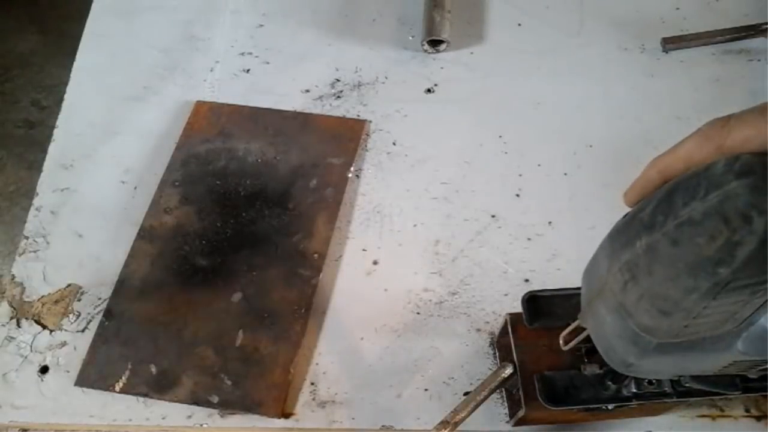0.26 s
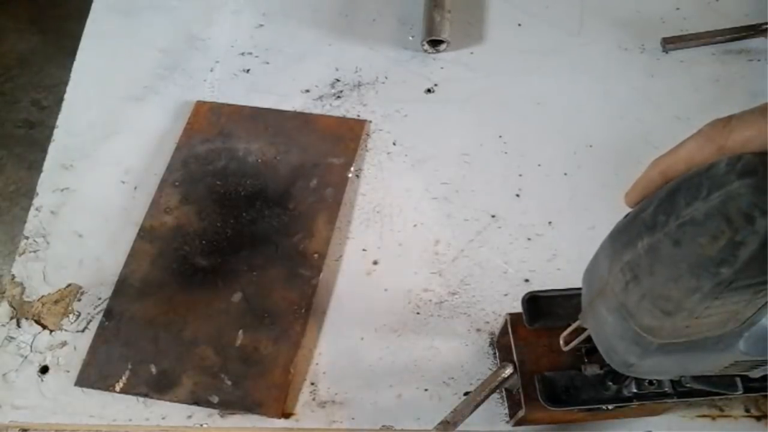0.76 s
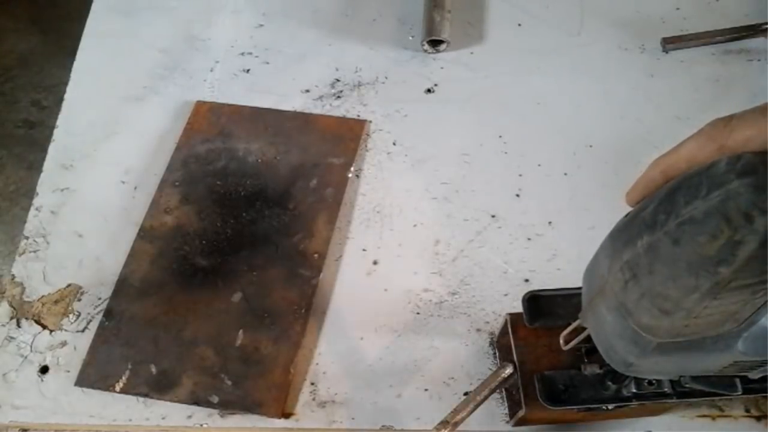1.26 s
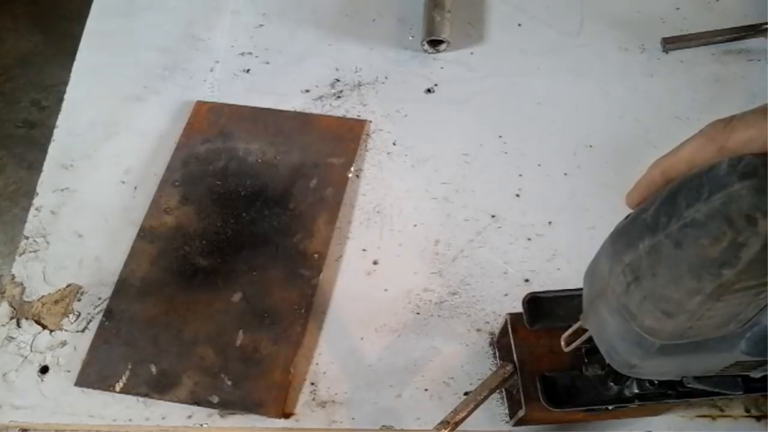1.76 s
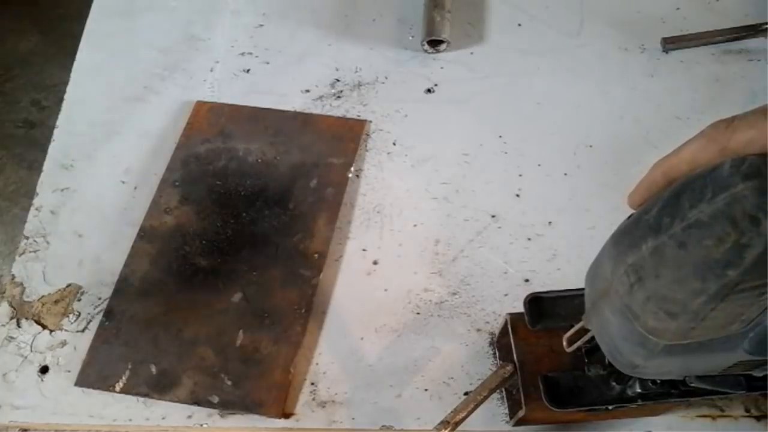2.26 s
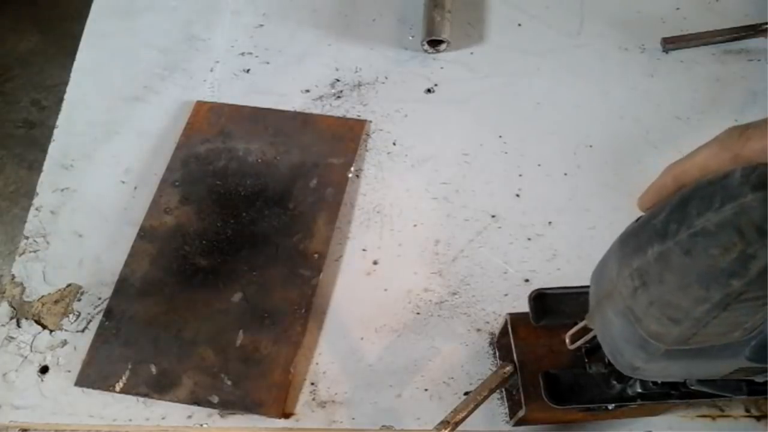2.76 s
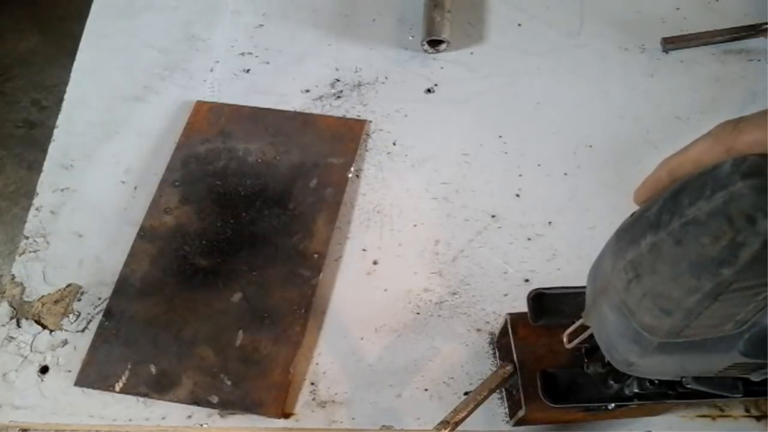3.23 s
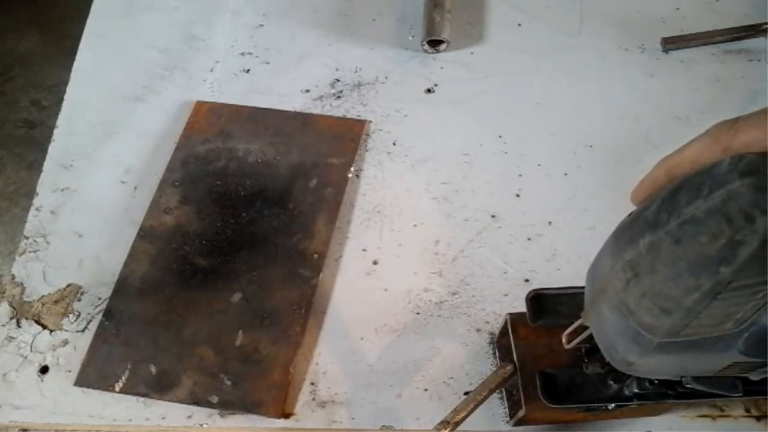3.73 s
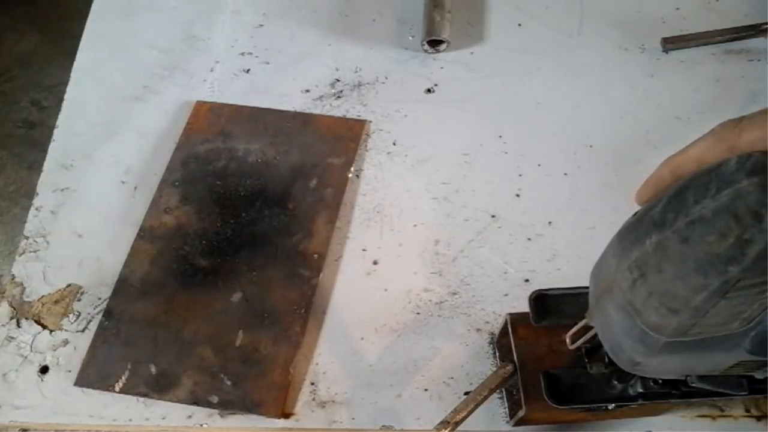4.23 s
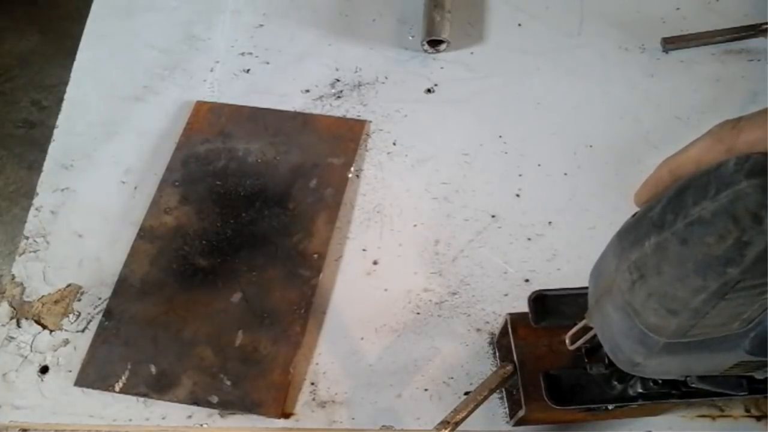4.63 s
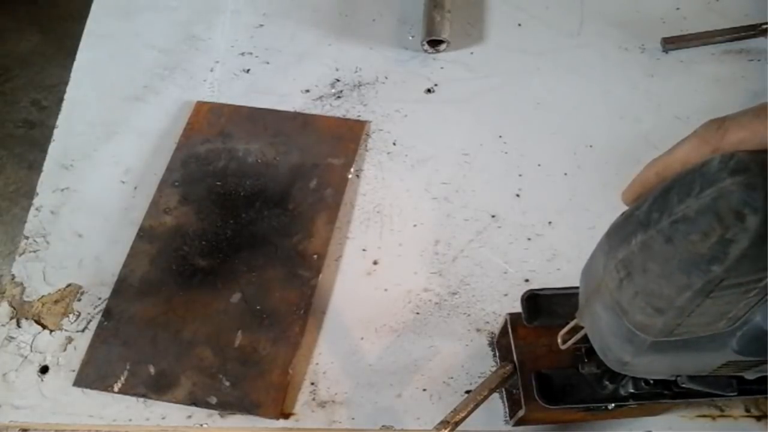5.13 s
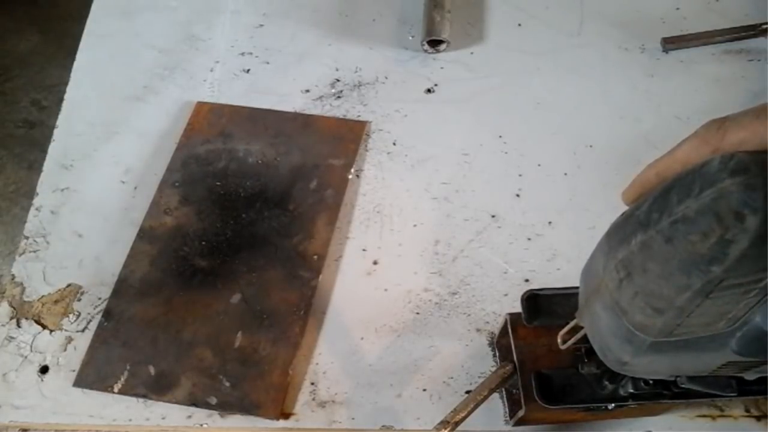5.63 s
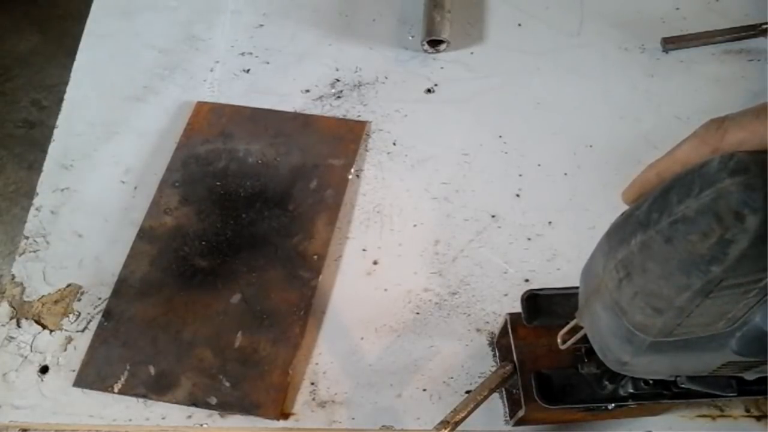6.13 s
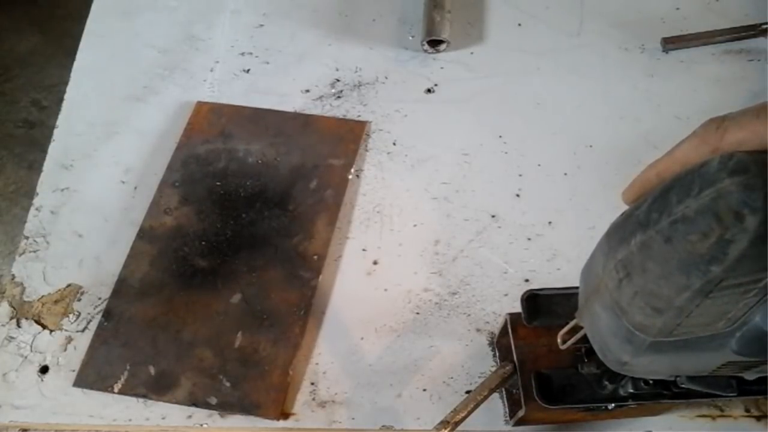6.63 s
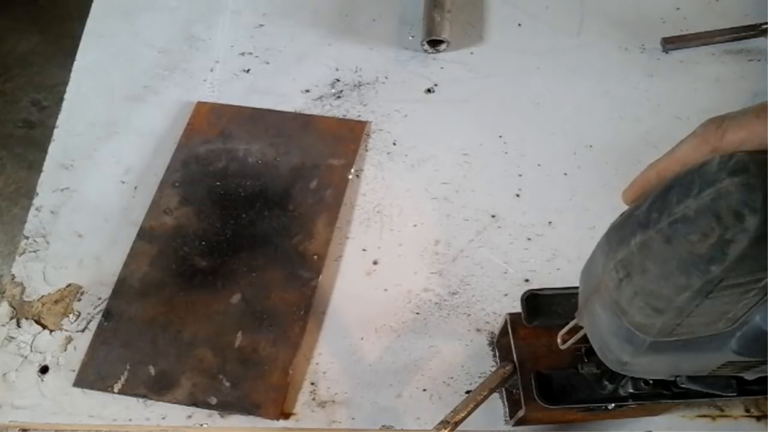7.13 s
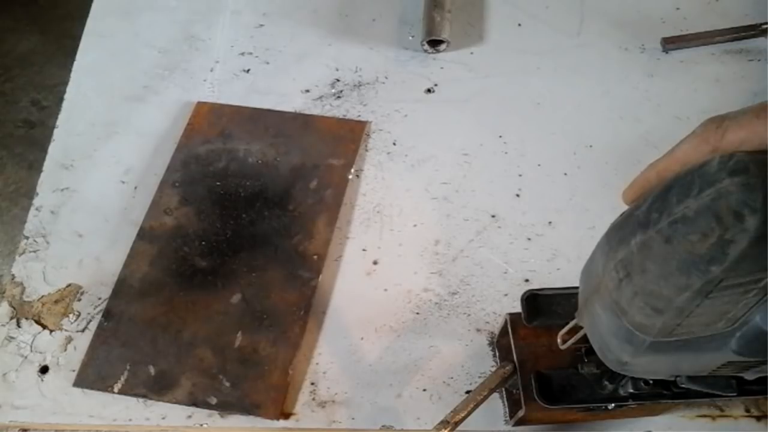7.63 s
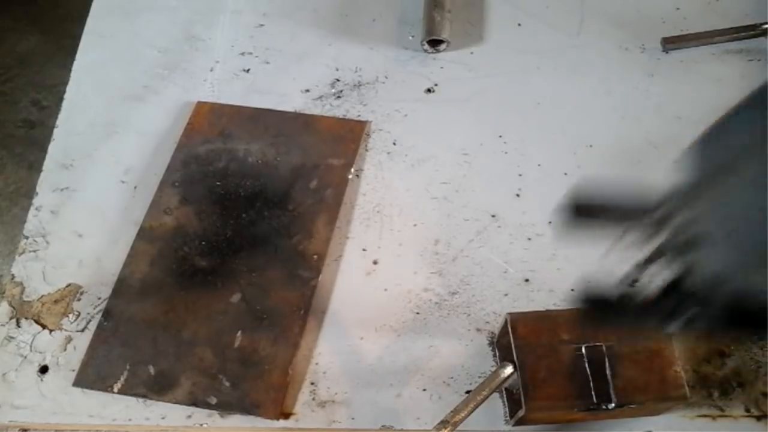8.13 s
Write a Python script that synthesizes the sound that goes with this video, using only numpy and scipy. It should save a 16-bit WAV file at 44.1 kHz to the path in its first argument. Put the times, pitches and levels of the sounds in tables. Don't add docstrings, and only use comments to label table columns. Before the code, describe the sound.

Close stereo pickup in a workshop: an electric jigsaw kicks on with a rattling buzz, revs up and saws steel at a steady fast rasp, gears whining, guide clanking, pinched blade squealing. After about five seconds it coasts down, the buzz breaking into separate knocks with tiny tooth ticks. It stops; a distant machine hums softly and the shoe scrapes off lightly.

```python
import sys
import numpy as np
from scipy import signal
from scipy.fft import rfft, irfft, next_fast_len
from scipy.io import wavfile
from scipy.ndimage import uniform_filter1d, map_coordinates

SR = 44100
rng = np.random.default_rng(int(sys.argv[2]) if len(sys.argv) > 2 else 0)


def wav_out(sig):
    wavfile.write(sys.argv[1], SR, np.round(np.clip(np.atleast_2d(sig).T, -1, 1) * 32767).astype(np.int16))


def invert_db(level):
    return 10 ** (np.asarray(level, dtype=float) / 20)


N = 369996

FULL_RATE = 54.5
STALL_S, STALL_DB_PER_S = 7.385, 87
DAMPED_S, DAMPED_DB_PER_S = 7.4, 101

# time in seconds, peak level in dB.
LAST_STROKES = [(6.571, -16), (6.628, -13.5), (6.683, -15.5), (6.7432, -17.5), (6.8081, -17.5),
                (6.88, -14.5), (6.958, -13.5), (7.0461, -12), (7.1474, -12), (7.2758, -14.5),
                (7.4729, -27.5)]


def unit(x):
    return x / np.sqrt(np.mean(x ** 2) + 1e-20)


def along(points, hz):
    f, v = np.transpose(points)
    return np.interp(np.log(hz + 1), np.log(f + 1), v)


def clock():
    return np.arange(N) / SR


def after(start_s, db_per_s):
    return -db_per_s * np.clip(clock() - start_s, 0, None)


def spell(on_s, off_s, db, rise_db_per_s, fall_db_per_s):
    return db - rise_db_per_s * np.clip(on_s - clock(), 0, None) + after(off_s, fall_db_per_s)


def wobble(rate):
    at = np.arange(0, N + 8, 8)
    knots = rng.standard_normal(int(N * rate / SR) + 4)
    return np.interp(np.arange(N), at, map_coordinates(knots, [at * rate / SR]))


def filtered(x, response):
    m = next_fast_len(N + SR // 2)
    return irfft(rfft(x, m) * response(np.fft.rfftfreq(m, 1 / SR)), m)[..., :N]


def coloured(x, spectrum):
    gain = lambda hz: invert_db(along(spectrum, hz))
    return filtered(x, lambda hz: gain(hz) / np.sqrt(np.mean(gain(hz) ** 2)))


def resonant(x, modes):
    def response(f):
        total = 0
        for k, (c, w, db) in enumerate(modes):
            total = total + (-1) ** k * invert_db(db) * 1j * f * w / (c * c - f * f + 1j * f * w)
        return total
    return filtered(x, response)


def noise():
    return rng.standard_normal((2, N))


def spikes(s, db):
    at = np.round(np.asarray(s) * SR).astype(int)
    return np.bincount(np.clip(at, 0, N - 1), invert_db(db), N)


def bursts(s, db, rise, t60, crack=0.):
    t = np.arange(SR // 8) / SR
    shape = (1 - np.exp(-t / rise)) * invert_db(-60 * t / t60)
    level = np.abs(signal.fftconvolve(spikes(s, db), shape)[:N])
    return level * noise() + crack * spikes(s, db)


def speed():
    # shortfall in strokes per s, time constant in seconds.
    run_up = [
        (35, .35),
        (11.5, .05),
    ]
    cut_s, drag_s, rub_rate = 5.03, 4, 56
    t = clock()
    driven = FULL_RATE - sum(short * np.exp(-t / tau) for short, tau in run_up)
    coasting = (FULL_RATE + rub_rate) * np.exp(-(t - cut_s) / drag_s) - rub_rate
    return np.clip(np.minimum(driven, coasting), 1, None)


def slowness_db():
    return 20 * np.log10(speed() / FULL_RATE)


def crank():
    turns = np.cumsum(speed()) / SR
    last = np.array(LAST_STROKES)[:, 0]
    turns -= turns[round(last[0] * SR)]
    gap = np.diff(last)
    back = last[:-1] + gap * (.5 - .45 * gap)
    reversals = np.sort(np.r_[last, back])
    slow = np.interp(clock(), reversals, np.arange(2 * len(last) - 1) / 2)
    turns = np.where(turns < 0, turns, slow)
    return turns, uniform_filter1d(np.gradient(turns) * SR, size=2000)


def teeth(turns):
    # time in seconds, level in dB.
    press = [(0, -19), (.07, -7), (.15, 1.5), (.35, 1.5), (1.2, 0), (2.5, 0), (3.8, -.5), (4.7, -0.5),
             (5.9, 1.5), (6.4, 0), (6.95, 1.5), (7.25, -1)]
    # frequency in Hz, density in dB per Hz.
    rasp_hz_db = [(410, -46), (700, -10.5), (1140, -10.5), (1370, -5), (1890, -5.5), (2470, 0),
                  (2840, -1.5), (4540, -7), (6890, -18.5), (9000, -23.5), (11700, -50.5), (19800, -120)]
    fizz_hz_db = [(3530, -7.5), (6000, -5.5), (10000, -7), (11300, -7.5), (14000, -12.5), (15600, -15.5)]
    bench_hz_db = [(60, -52.5), (130, -12), (200, -7), (474, -5), (741, -9.5), (1300, -6.5), (1700, -29),
                   (2900, -120)]
    slow_db = slowness_db()
    rasp_db = -18.5 + 0.87 * slow_db
    fizz_db = -31.5 + 0.99 * slow_db + after(7.2, 60)
    bench_db = -30.5 + 0.32 * slow_db + 0.95 * wobble(2.834)
    press_s, press_db = np.transpose(press)
    engaged = invert_db(np.interp(clock(), press_s, press_db))
    biting = invert_db(after(STALL_S, STALL_DB_PER_S))
    bite = invert_db(-2 * (2 * turns % 1) - 1.5 * (turns % 1))
    grit = lambda depth_db, rate: invert_db(depth_db * wobble(rate))
    rasp = coloured(unit(bite * grit(1.52, 500) * grit(0.55, 30) * noise()), rasp_hz_db)
    fizz = coloured(unit(bite * grit(2, 1500) * grit(0.57, 20) * grit(0.38, 8) * noise()), fizz_hz_db)
    bench = coloured(unit(bite * noise()), bench_hz_db)
    return engaged * (biting * (invert_db(rasp_db) * rasp + invert_db(bench_db) * bench) + invert_db(fizz_db) * fizz)


def knocks(turns):
    # frequency in Hz, density in dB per Hz.
    clank_hz_db = [(530, -45), (900, -10), (1480, 0.5), (2660, -5), (2890, -3.5), (3630, -4.5),
                   (4230, -12.5), (12400, -29), (15500, -28.5)]
    # frequency in Hz, width in Hz, level in dB.
    thud_modes = [(206, 60, -11), (425, 60, -4.5), (580, 78, -2.5), (880, 200, -14.5), (1462, 94, -8)]
    thud_db, back_db, blurred_db, scatter_db = 17.5, -5.5, -.5, 2.5
    at = np.flatnonzero(np.diff(np.floor(2 * turns)) > 0) + 1
    half = np.round(2 * turns[at]).astype(int)
    is_back, at_speed = half % 2, half < -12
    peak_db = np.array(LAST_STROKES)[np.clip(half // 2, 0, len(LAST_STROKES) - 1), 1]
    chance = (half < 0) * np.clip(rng.standard_normal((2, len(at))), -2, 1)
    s = at / SR + .0007 * chance[0]
    start_db = -40 * np.clip(.15 - s, 0, 1) / .15
    db = peak_db + blurred_db * at_speed + scatter_db * chance[1] + is_back * back_db + start_db
    clank = coloured(bursts(s, db - 3, rise=.0008, t60=.04, crack=.6), clank_hz_db)
    low_db = db + thud_db - 8 * is_back - 8.5 * at_speed
    thud = resonant(bursts(s, low_db, rise=.002, t60=.05, crack=7), thud_modes)
    return clank + thud


def gear_whine(turns):
    # multiple of stroke rate, blur in Hz, running level in dB, steady share 0-1.
    gears = [(22, 14, -52, .45), (42.5, 190, -31, 0), (108, 85, -40, .25)]
    # start in seconds, end in seconds, level in dB, rise and fall in dB per s.
    surges = [
        (5.64, 5.95, -36, 60, 25),
        (.16, .9, -25.5, 150, 6),
        (.11, .29, -25.5, 200, 70),
    ]
    whine = 0
    for (k, blur_hz, db, steady), surge in zip(gears, surges):
        level_db = np.maximum(db + 1.3 * slowness_db(), spell(*surge))
        blurred = unit(filtered(noise(), lambda f: 1 / (1 + (f / blur_hz) ** 2)))
        strength = steady + np.sqrt(1 - steady ** 2) * blurred
        whine = whine + invert_db(level_db) * strength * np.sin(2 * np.pi * k * turns)
    return whine * invert_db(after(STALL_S, STALL_DB_PER_S))


def starting_jolts():
    # frequency in Hz, density in dB per Hz.
    jolt_hz_db = [(120, -50), (250, -20), (470, -4), (1100, -8), (1800, -3), (3200, 2.5), (4300, -13),
                  (6300, -17), (9000, -27), (15500, -36)]
    kick_s, buzz_s = .0161 * np.arange(5), .00833 * np.arange(15)
    s = np.r_[.0003 + kick_s, .0724 + buzz_s]
    buzz_db = -18.5 + 36.5 * buzz_s + 2 * rng.standard_normal(len(buzz_s))
    db = np.r_[-9.5 + 0 * kick_s, buzz_db]
    return invert_db(8) * coloured(bursts(s, db, rise=.0015, t60=.013, crack=.6), jolt_hz_db)


def singing():
    # frequency in Hz, width in Hz, level in dB.
    squeal_modes = [(2520, 300, 0)]
    block_modes = [(591, 82, -2), (1484, 136, 2.5), (5380, 83, -9.5), (6520, 130, -14.5), (7700, 47, -9.5)]
    # start in seconds, end in seconds, level in dB, rise and fall in dB per s.
    pinched = (2, 5, -26, 17, 39.5)
    eased = (5.4, 6, -31.5, 4, 7)
    # frequency in Hz, start in seconds, end in seconds, level in dB.
    blade_modes = [
        (13600, .3, 2.8, -52.5),
        (11140, 2.1, 4.2, -47.5),
        (12300, 5.9, 6.75, -56),
    ]
    width_hz, fade_db_per_s = 170, 14
    damped_db = after(DAMPED_S, DAMPED_DB_PER_S)
    squeal = invert_db(spell(*pinched) + wobble(6.1)) * unit(resonant(noise(), squeal_modes))
    blade = 0
    for hz, on_s, off_s, db in blade_modes:
        tone = unit(filtered(noise(), lambda f: 1 / (1 + ((f - hz) / width_hz) ** 2)))
        blade = blade + invert_db(spell(on_s, off_s, db, fade_db_per_s, fade_db_per_s) + damped_db) * tone
    broad_modes = [(hz, 3 * w, 0) for hz, w, _ in block_modes]
    block = unit(resonant(resonant(noise(), block_modes), broad_modes))
    return squeal + blade + invert_db(spell(*eased) + damped_db) * block


def small_metal():
    # time in seconds, peak level in dB.
    ticks_s_db = [(6.9566, -33.5), (7.0424, -36), (7.1477, -32.5), (7.1606, -24), (7.2779, -41),
                  (7.2863, -37), (7.3043, -34.5), (7.3363, -25), (7.39, -26.5), (7.416, -35), (7.4729, -27)]
    # frequency in Hz, width in Hz, level in dB.
    scrape_modes = [(2310, 90, -7.5), (4520, 50, -3), (5260, 60, -3.5), (7250, 61, -11.5)]
    # start in seconds, end in seconds, level in dB, rise and fall in dB per s.
    lifts = [
        (8.09, 8.19, -76, 2001, 370),
        (8.137, 8.172, -63, 1300, 650),
    ]
    # start in seconds, end in seconds, level in dB, rise and fall in dB per s.
    stir = (8.15, 8.39, -68.5, 150, 5)
    tick_hz_db = [(5000, -34.5), (8500, 1.5), (14000, -1.5), (15800, -13)]
    rustle_hz_db = [(600, -30), (2000, -2), (3500, 0), (5500, -12.5), (12000, -40)]
    ticks = invert_db(-3.5) * coloured(bursts(*np.transpose(ticks_s_db), rise=.0002, t60=0.02), tick_hz_db)
    rustle = invert_db(spell(*stir)) * unit(coloured(noise(), rustle_hz_db))
    lift_db = np.max([spell(*move) for move in lifts], axis=0)
    scrape = invert_db(lift_db) * unit(resonant(noise(), scrape_modes) + .015 * noise())
    return rustle + ticks + scrape


def unbalance(turns, rate):
    # multiple of stroke rate, level in dB.
    orders = [(2, -46), (4, -37.5), (5, -47), (6, -46), (7, -45), (8, -47), (9, -44), (10, -45), (11, -45),
              (14, -41.5), (15, -43.5)]
    # frequency in Hz, density in dB per Hz.
    rumble_hz_db = [(15, -27.5), (25, -7), (70, -3), (130, 1.5), (250, -26.5), (500, -120)]
    shake = 0
    for k, db in orders:
        right = min(-.6 + 0.18 * max(k - 8, 0), .3)
        line = invert_db(db + 2.4 * wobble(6)) * np.sin(2 * np.pi * k * turns + 0.37 * wobble(8))
        shake = shake + line * [[1], [right]]
    rumble = invert_db(-51 + after(7.05, 25)) * coloured(noise(), rumble_hz_db) * invert_db([[-5], [4]])
    lowest_mode = unit(resonant(rng.standard_normal(N), [(216.5, 12, 0)]))
    boom = invert_db(spell(0, 7, -41, 23, 28.5)) * lowest_mode
    pace = rate / FULL_RATE
    return boom * [[1], [-.6]] + pace ** 3.5 * shake + pace ** .7 * rumble


def room(x):
    # frequency in Hz, t60 in seconds.
    decay = [(200, 0.17), (2000, 0.54), (10000, 0.19)]
    hz, t, z = signal.stft(rng.standard_normal((2, SR // 2)), SR, nperseg=256)
    z = z * invert_db(-60 * t / along(decay, hz)[:, None])
    tail = signal.istft(z, SR, nperseg=256)[1]
    late = np.pad(x, ((0, 0), (300, 0)))
    return signal.fftconvolve(late, tail / np.linalg.norm(tail[0]), axes=1)[:, :N]


def ports(pair):
    # frequency in Hz, likeness of the sides 0-1.
    alike = [(25, .1), (60, .5), (130, .82), (290, .8), (640, .55), (1400, .45), (2500, .4), (4500, .28),
             (8000, .1), (15000, .15)]
    # frequency in Hz, lead of the left in radians, apart from its later arrival.
    lead = [(0, 3.2), (260, 3.9), (780, 3.8), (1290, 5.8), (2500, 6.4), (15000, 6.3)]
    # frequency in Hz, left minus right in dB.
    sides = [(25, -8), (60, -3.5), (110, -1.5), (200, 1.5), (380, -2), (700, -1.5), (1290, 2), (2380, -5),
             (4400, -9), (8120, -3.5), (15000, -1.5)]
    # frequency in Hz, width in Hz, left level in dB, right level in dB.
    steel = [(604, 40, 1.5, 0), (1364, 51, 2.5, -9), (2635, 700, -4.5, -4), (3505, 360, -4, 2.5),
             (4680, 190, -3, 3), (5415, 640, -2.5, 3.5), (6200, 300, 3.5, 2), (7700, 250, 1, 2.5),
             (9600, 250, -4.5, 1), (11100, 270, 3, 1.5), (12500, 350, -0.5, 5), (13600, 250, 0, 4)]
    left_late_s = .00043
    share = lambda hz: np.clip(along(alike, hz), 0, 1)
    phase = lambda hz: along(lead, hz) - 2 * np.pi * hz * left_late_s
    shared = filtered(pair[0], lambda hz: share(hz) * np.exp(-1j * phase(hz)))
    own = filtered(pair[1], lambda hz: np.sqrt(1 - share(hz) ** 2))

    def response(hz):
        db = along(sides, hz) * [[.5], [-.5]]
        for c, w, left_db, right_db in steel:
            db = db + np.array([[left_db], [right_db]]) / (1 + (2 * (hz - c) / w) ** 2)
        return invert_db(db)
    return filtered(np.array([pair[0], shared + own]), response)


def workshop():
    # time in seconds, peak level in dB, slope in dB per s.
    swells = [
        (7.9, -57, 30),
        (8.164, -53, 200.5),
        (8.25, -51, 200),
        (8.39, -57, 43),
    ]
    # frequency in Hz, density in dB per Hz.
    air_hz_db = [(15, -47), (25, -18.5), (60, -19.5), (150, -12), (314, -9.5), (594, -9), (775, -15.5),
                 (2500, -27), (8000, -35.5), (14500, -37), (14800, -70)]
    hum_db = np.max([spell(s, s, db, slope, slope) for s, db, slope in swells], axis=0).clip(-64)
    mid, side = unit(resonant(noise(), [(596, 11, 0)]))
    hum = invert_db(hum_db + 1.8 * wobble(15)) * (mid + .4 * side * [[1], [-1]])
    return hum + invert_db(-55.5) * coloured(noise(), air_hz_db)


def scene():
    turns, rate = crank()
    motor = gear_whine(turns) + starting_jolts()
    saw = teeth(turns) + knocks(turns) + motor + singing() + small_metal()
    return ports(saw + invert_db(-9.5) * room(saw)) + unbalance(turns, rate) + workshop()


def band_limit(x):
    return signal.sosfilt(signal.butter(12, 15710, fs=SR, output="sos"), x)


def record(dry):
    soft = dry / (1 + np.abs(dry / .85) ** 5) ** (1 / 5)
    return band_limit(filtered(soft, lambda hz: hz < 15720))


dry = scene()
out = record(dry)
wav_out(out)
```